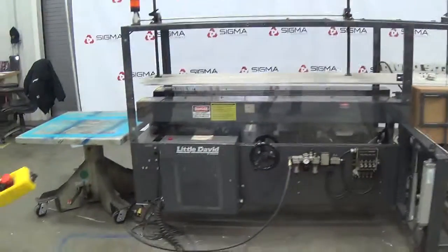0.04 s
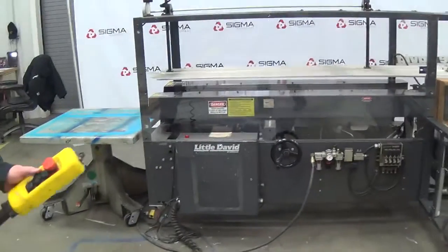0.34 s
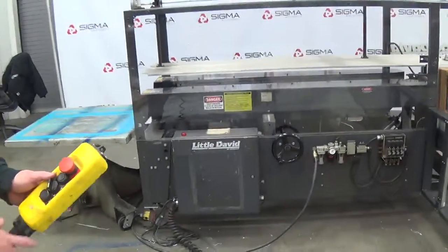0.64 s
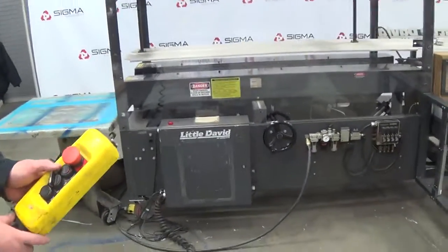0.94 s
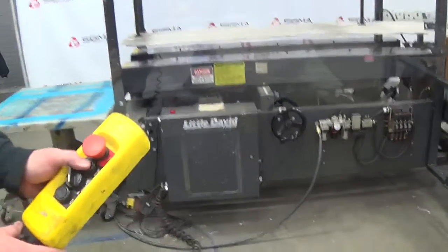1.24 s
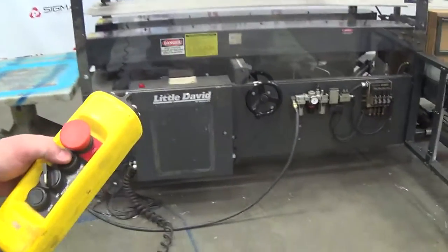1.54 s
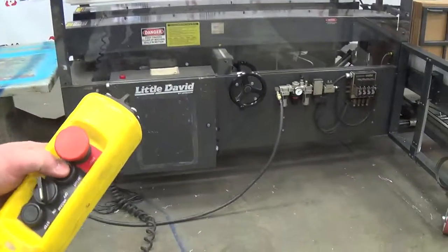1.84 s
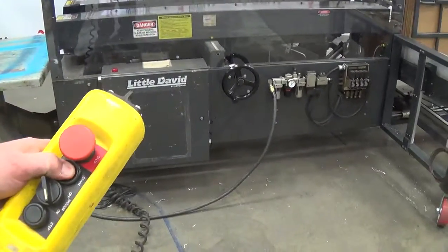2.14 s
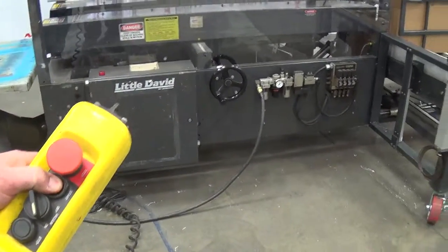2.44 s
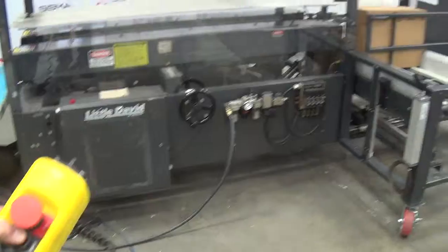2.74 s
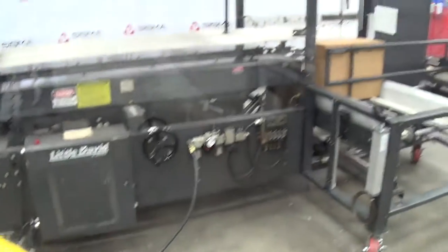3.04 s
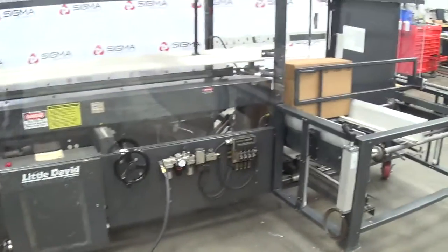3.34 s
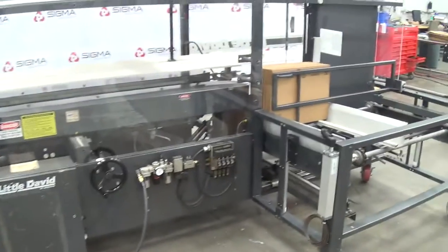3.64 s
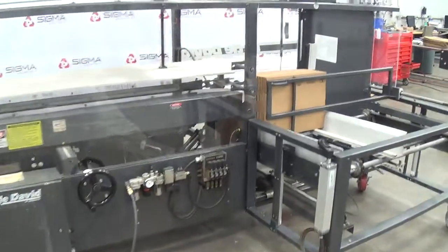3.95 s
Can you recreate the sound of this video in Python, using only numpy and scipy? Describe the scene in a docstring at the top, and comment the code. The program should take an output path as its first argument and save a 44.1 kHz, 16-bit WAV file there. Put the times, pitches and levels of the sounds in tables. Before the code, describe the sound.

A carton-packing machine is switched on after a stretch of soft workshop ventilation hum. A nearby click and a loud metallic clack set off steady rumbling and roller clatter, while compressed air hisses and twice pulses in a fast flutter.

```python
"""In a quiet workshop, humming with ventilation, a carton-packing machine is started from a pendant.
The button clicks and the switchgear clacks: impacts that set a housing and a steel frame ringing.
The motor hums in steady partials while the conveyor rumbles, clinks and rattles along.
Compressed air hisses from the valves and twice surges in a fast flutter, a train of puffs
coloured by the resonances of the panels. Then the switchgear clacks again."""
import sys
import numpy as np
from scipy import signal
from scipy.fft import rfft, irfft, next_fast_len
from scipy.io import wavfile
from scipy.ndimage import map_coordinates

SR = 44100
rng = np.random.default_rng(int(sys.argv[2]) if len(sys.argv) > 2 else 0)


def output_pcm(signal):
    """Save a mono or channel-first signal as 16-bit PCM at the path in sys.argv[1].

    Samples are clipped to [-1, 1] before scaling.
    """
    pcm = np.clip(np.atleast_2d(signal).T, -1, 1) * 32767
    wavfile.write(sys.argv[1], SR, np.round(pcm).astype(np.int16))


N = 176400
CLANG_S = 2.038


def amp(db):
    """Amplitude ratio of a level in decibels."""
    return 10 ** (np.asarray(db) / 20)


def unit(x):
    """Normalisation to rms 1."""
    return x / np.sqrt(np.mean(x ** 2) + 1e-20)


def clock(size=N):
    """Time of every sample in seconds."""
    return np.arange(size) / SR


def along(points, hz):
    """Interpolation of (frequency_hz, value) points on a logarithmic frequency axis."""
    f, v = np.transpose(points)
    return np.interp(np.log(hz + 1), np.log(f + 1), v)


def curve(rows):
    """Linear interpolation of (time_s, value) points at every sample."""
    return np.interp(clock(), *np.transpose(rows))


def wobble(rate):
    """Smooth random modulation, with rate knots a second."""
    return map_coordinates(rng.standard_normal(4000), [clock() * rate], mode="mirror")


def filtered(x, response):
    """Linear filtering: the spectrum is multiplied by a frequency response."""
    m = next_fast_len(x.shape[-1] + 8192)
    return irfft(rfft(x, m) * response(np.fft.rfftfreq(m, 1 / SR)), m)[..., :x.shape[-1]]


def stereo(pair, colour):
    """Partial coherence: two unrelated signals, coloured, add on the left and subtract on the right."""
    # width of the sound field: frequency_hz, side_minus_mid_db
    width = [(60, -9), (125, -21), (250, -17.5), (500, -10.5), (2000, -8.5), (4000, -9), (9000, -10.5)]
    mid, side = filtered(pair, lambda hz: amp([colour(hz), colour(hz) + along(width, hz)]))
    return np.array([mid + side, mid - side])


def noise(colour, size=N):
    """Stereo Gaussian noise of rms 1; colour gives its spectral envelope in dB."""
    return unit(stereo(rng.standard_normal((2, size)), colour))


def hump(centre_hz, octaves):
    """Spectral envelope of a single resonance, in dB."""
    def colour(hz):
        detuning = np.log2((hz + 1) / centre_hz) / octaves
        return -20 * np.log10(1 + detuning ** 2 / 2 + detuning ** 4 / 20)
    return colour


def tilted(points, tilt_db):
    """Spectral envelope with an added slope of tilt_db per octave."""
    return lambda hz: along(points, hz) + tilt_db * np.log2(hz + 1)


def burst(colour, attack, hold, t60):
    """A noise transient: linear rise, then exponential decay from time hold; all in seconds."""
    t = clock(SR // 2)
    decay = amp(-60 * np.maximum(t - hold, 0) / t60)
    return noise(colour, size=len(t)) * np.minimum(t / attack, 1) * decay


def ring(modes, contact_s=0.00053):
    """Free vibration of a struck part: a sum of damped modes that builds up during contact."""
    t = clock(SR // 2)
    vibration = sum(amp(db - 60 * t / t60) * np.sin(2 * np.pi * hz * t + rng.uniform(0, 2 * np.pi))
                    for hz, db, t60 in modes)
    return np.minimum(t / contact_s, 1) * vibration * np.sqrt(2)


def tones(partials, waver_s):
    """Partials made slightly unsteady by random phase modulation."""
    return sum(amp(db) * np.sqrt(2) * np.sin(2 * np.pi * hz * (clock() + waver_s * wobble(5.89)))
               for hz, db in partials)


def steady(x, seconds):
    """Division by the running rms evens out the slow swells of a noise."""
    power = signal.fftconvolve(np.mean(x ** 2, 0), np.hanning(round(2 * seconds * SR)), "same")
    return unit(x / np.sqrt(np.abs(power) + 1e-9))


def add(out, start_s, x):
    """Superposition of x on out, from start_s."""
    i = round(start_s * SR)
    out[:, i:i + x.shape[-1]] += x[..., :max(N - i, 0)]


def ventilation():
    """Broadband flow noise, the fading drone of a duct resonance and a fan's tonal whine."""
    # spectrum of the moving air: frequency_hz, density_db
    air_spectrum = [(25, 0), (80, -13), (140, -3.5), (240, -7.5), (330, 0.5), (700, 1.5), (1200, -1),
                    (2500, -9.5), (6000, -20), (11000, -21)]
    # swell of the fan's whine: time_s, level_db
    fan_levels = [(0, -53.5), (.7, -50.5), (1.2, -50), (1.55, -52), (1.9, -57.5)]
    # partials of the fan: pitch_hz, relative_db
    fan_partials = [(411.9, -1), (1101, -16.5), (121.6, -21.5)]
    air = amp(-54.5) * noise(lambda hz: along(air_spectrum, hz))
    drone_db = -63.5 - 4.5 * clock() + 3.5 * wobble(3.9)
    drone = amp(drone_db) * noise(hump(centre_hz=240.4, octaves=0.038))
    return air + drone + amp(curve(fan_levels)) * tones(fan_partials, waver_s=0.0001)


def pendant():
    """Impact and friction: the pendant ticks, a hand rubs it and knocks its shell into vibration."""
    # small knocks and button clicks: start_s, level_db, centre_hz, width_octaves, t60_s
    ticks = [(0.171, -46, 274, 0.23, 0.095), (1.132, -55.5, 2470, 0.72, 0.079),
             (1.827, -35, 1680, 0.23, 0.05), (1.8925, -42, 2200, 0.5, 0.016),
             (1.942, -45, 3000, 0.91, .014), (1.9672, -24, 2430, 0.25, 0.064),
             (1.967, -31, 2740, 1.1, 0.084)]
    # rubbing of hand and thumb: start_s, length_s, level_db, centre_hz, width_octaves
    rubs = [(0.188, .11, -68, 4900, 0.37), (1.767, 0.044, -62, 5200, 0.14), (1.802, 0.037, -48, 1860, 0.77)]
    # knocks of the hand on the shell: start_s, level_db
    knocks = [(.2776, -35.5), (1.128, -45)]
    # modes of the plastic shell: pitch_hz, relative_db, t60_s
    shell_modes = [(700, -5.5, 0.027), (1260, 3.5, 0.0032), (1800, 7, 0.0052)]
    out = np.zeros((2, N))
    for start, db, hz, octaves, t60 in ticks:
        add(out, start, amp(db) * burst(hump(hz, octaves), attack=0.0002, hold=0.00033, t60=t60))
    for start, length, db, hz, octaves in rubs:
        add(out, start, amp(db) * burst(hump(hz, octaves), attack=length / 2, hold=length, t60=0.079))
    for start, db in knocks:
        add(out, start, amp(db) * ring(shell_modes))
    return out


def hall_tail():
    """The workshop's impulse response, of energy 1: diffuse decay in which the top treble dies first."""
    # reverberation time: frequency_hz, t60_s
    decay_times = [(200, 0.33), (2000, 1), (6000, 0.47), (11000, 0.13)]
    hz, t, spectra = signal.stft(rng.standard_normal((2, SR // 2)), SR, nperseg=256)
    decay = amp(-60 * t / along(decay_times, hz)[:, None])
    tail = signal.istft(spectra * decay, SR, nperseg=256)[1][:, :SR // 2]
    return tail / np.linalg.norm(tail[0])


def reverberation(direct):
    """Reflected sound: the direct sound convolved with the workshop's impulse response."""
    echo = signal.fftconvolve(direct.mean(0)[None], hall_tail(), axes=1)[:, :N]
    return amp(-9.5) * stereo(echo, np.zeros_like)


def clinks(per_s=260, centre_hz=1085.6, log_spread=1.2, t60=0.13):
    """Random impacts: loose rollers and chain links each ring in one damped mode of their own pitch."""
    out, t = np.zeros((2, N)), clock(SR // 8)
    for when, pitch, size, place in rng.random((int(per_s * N / SR), 4)):
        hz = centre_hz * np.exp(log_spread * (2 * pitch - 1))
        energy = -np.log(1 - size) / hz  # exponentially distributed, weaker at high pitch
        link = np.sin(2 * np.pi * hz * t) * amp(-60 * t / t60) * np.sqrt(energy)
        add(out, when * N / SR, np.outer([place + .5, 1.5 - place], link))
    return unit(out)


def conveyor(start_s=1.97, spin_up_s=0.0064, clatter_per_s=53):
    """Rotation and rolling contact: the motor's tonal hum over a low rumble and clattering rollers."""
    # course of the rumble: time_s, relative_db
    rumble_levels = [(2.06, -38), (3.346, -40), (3.96, -36.5)]
    # spectrum of the rumble: frequency_hz, density_db
    rumble_spectrum = [(25, -47), (50, -50), (70, -25), (140, -19.5), (200, -4), (300, 0), (420, -8),
                       (650, -31), (1500, -49)]
    # course of the rollers: time_s, level_db
    roller_levels = [(2.05, -37.5), (2.2, -41), (2.45, -38.5), (2.75, -38), (2.95, -39.5), (3.25, -39),
                     (3.6, -39.5), (3.95, -37)]
    # spectrum of the rolling noise: frequency_hz, density_db
    roller_spectrum = [(200, -32), (500, 2), (900, -1.5), (1600, -2), (2400, -9), (3300, -14.5),
                       (5000, -15.5), (7000, -20), (9000, -28.5), (11000, -22.5)]
    # partials of the motor: pitch_hz, level_db
    motor_partials = [(119.7, -56), (317.6, -54.5), (411, -57.5), (765, -64), (925, -54), (3165, -69)]
    low_noise = steady(noise(lambda hz: along(rumble_spectrum, hz)), seconds=0.027)
    rumble = amp(curve(rumble_levels) - 3) * low_noise
    clatter = amp(curve(roller_levels) + 0.5 * wobble(clatter_per_s))
    rolling = noise(lambda hz: along(roller_spectrum, hz))
    rollers = clatter * unit(rolling + amp(-5) * clinks())
    running = np.clip((clock() - start_s) / spin_up_s, 0, 1)
    return running * (rumble + rollers + tones(motor_partials, waver_s=0.00013))


def switchgear(lead_s=0.0095, lead_db=-11):
    """Two-stage impact: a light blow leads the main one, which excites the modes of the housing."""
    # switch clacks: start_s, level_db, left_minus_right_db, tilt_db_per_octave
    clacks = [(1.9977, -14, -2.5, 0.5), (3.9978, -16, -1, -0.5)]
    # spectrum of a blow: frequency_hz, density_db
    blow_spectrum = [(100, -4), (400, 1), (1100, -18), (1600, -9), (2600, 0), (3700, -5), (6400, -5),
                     (11000, -5)]
    # modes of the switch housing: pitch_hz, relative_db, t60_s
    housing_modes = [(690, -13, 0.033), (1067, -14, 0.062), (2200, -10.5, 0.031), (2710, -5.5, 0.02),
                     (4610, -18, 0.065), (5810, -10.5, 0.04), (6920, -10, 0.035), (8600, -10, 0.035)]
    out = np.zeros((2, N))
    for start, db, pan_db, tilt in clacks:
        colour = tilted(blow_spectrum, tilt)
        lead = burst(colour, attack=0.001, hold=0.0028, t60=0.027)
        blow = burst(colour, attack=0.0013, hold=0.0016, t60=0.017) + ring(housing_modes)
        add(out, start - lead_s, amp(db + lead_db) * lead)
        add(out, start, amp(db + pan_db * np.array([[.5], [-.5]])) * blow)
    return out


def valves():
    """Turbulent jet noise: short exhausts of compressed air."""
    # valve exhausts: start_s, length_s, level_db, tilt_db_per_octave
    exhausts = [(1.997, 0.008, -36.5, 3), (2.028, 0.058, -38, -3), (2.179, 0.056, -38, -0.5),
                (2.352, 0.015, -48, 5), (2.587, 0.011, -43, 6), (2.604, 0.062, -43.5, -2.5),
                (2.979, 0.14, -48, -4), (3.4, 0.017, -49, -3), (3.44, 0.0071, -38, -1)]
    # spectrum of the jet: frequency_hz, density_db
    jet_spectrum = [(500, -15), (2000, 5), (5000, 4), (8000, 4), (11000, 0.5)]
    out = np.zeros((2, N))
    for start, length, db, tilt in exhausts:
        hiss = burst(tilted(jet_spectrum, tilt), attack=length * 0.18, hold=length, t60=0.38)
        add(out, start, amp(db) * hiss)
    return out


def clang(tick_s=2.0333, tick_hz=4770, tick_db=-13, tick_t60_s=0.0057):
    """Modal ringing of metal: a thin, heavily damped tick, then the longer ring of the steel frame."""
    # modes of the frame: pitch_hz, relative_db, t60_s
    steel_modes = [(3850, -9, 0.095), (4720, -10, 0.13), (6160, -10, .2), (7040, -4, .12)]
    out = np.zeros((2, N))
    add(out, tick_s, ring([(tick_hz, tick_db, tick_t60_s)]))
    add(out, CLANG_S, amp(-32.5) * ring(steel_modes))
    return out


def clang_band():
    """Damped resonance: the steel clang's brief ring near 3 kHz, as a narrow band of noise."""
    out = np.zeros((2, N))
    band = burst(hump(centre_hz=3020, octaves=0.034), attack=0.0036, hold=0.015, t60=0.041)
    add(out, CLANG_S, amp(-33.5) * band)
    return out


def panel_lift(hz):
    """Resonance of the machine's panels: each adds a Lorentzian peak to a spectrum in dB."""
    # panel resonances: centre_hz, width_hz, lift_db
    resonances = [(257, 17, 4), (495.5, 34, 12), (677, 35, 9.5), (900, 55, 13), (1222, 37, 6),
                  (1573, 120, 7), (1847, 25, 15.5), (2368, 54, 10), (2977, 63, 10.5)]
    return sum(db / (1 + (2 * (hz - centre) / width) ** 2) for centre, width, db in resonances)


def surges(crest=0.34, foot=0.3, rise_s=0.003, jitter_s=0.00005, scatter_db=0.75):
    """Periodic pulses heard as flutter: a swelling train of like puffs rings in the panels and hall."""
    # air surges: start_s, length_s, puffs_per_s, level_db, tilt_db_per_octave
    flutters = [(2.186, 0.17, 30.2, -31.5, -1.46), (3.655, 0.22, 31.1, -29.5, 0)]
    # spectrum of a puff: frequency_hz, density_db
    puff_spectrum = [(50, -40.5), (140, -7), (255, 10), (400, -4.5), (900, -5.5), (1800, -5.5), (3500, -6),
                     (6500, -4), (11000, -4.5)]
    out = np.zeros((2, N))
    for start, length, rate, db, tilt in flutters:
        train = np.zeros((2, N))
        puff = hall_tail() * np.minimum(clock(SR // 2) / rise_s, 1)
        for delay in np.arange(10) / rate:
            strength = np.interp(delay / length, [0, crest, 1, 1.2], [foot, 1, foot, 0])
            late, louder = rng.standard_normal(2)
            add(train, start + delay + jitter_s * late, strength * amp(scatter_db * louder) * puff)
        sound = stereo(train, lambda hz: tilted(puff_spectrum, tilt)(hz) + panel_lift(hz))
        out += amp(db) * unit(sound) * np.sqrt(length * SR / N)  # energy grows with the length
    return out


def rattles():
    """Sliding and rattling parts of the mechanism radiate bursts of noise, each about one resonance."""
    # slides and rattles: start_s, length_s, level_db, centre_hz, width_octaves
    movements = [(2.228, 0.024, -34.5, 273, 0.26), (2.333, 0.077, -32.5, 1320, 0.51),
                 (2.359, 0.076, -36, 520, 0.86), (2.363, 0.0086, -43, 5500, 0.076),
                 (2.582, 0.014, -35, 590, 0.8), (2.957, 0.027, -42.5, 2950, 0.68),
                 (3.171, 0.0087, -43, 1780, 0.62), (3.29, 0.029, -33.5, 885, 0.71),
                 (3.439, 0.077, -46, 2510, 0.59)]
    out = np.zeros((2, N))
    for start, length, db, hz, octaves in movements:
        add(out, start, amp(db) * burst(hump(hz, octaves), attack=length * 0.67, hold=length, t60=0.33))
    return out


def scene():
    """Superposition of all sources, with a slowly drifting level difference between left and right."""
    # stereo balance: time_s, left_minus_right_db
    balance = [(0, 0.5), (1.3, 2), (1.98, 0.3), (2.5, 0), (3.2, 0.4), (3.8, 1.3)]
    background = ventilation()
    contacts = pendant() + switchgear() + clang()
    echo = reverberation(contacts)
    machine = clang_band() + conveyor() + rattles() + valves() + surges()
    return (background + contacts + echo + machine) * amp(np.outer([.5, -.5], curve(balance)))


def record(dry):
    """Band limiting: a high-pass thins the deep bass and a steep low-pass removes the top treble."""
    low_cut_hz, top_hz = 91, 11080
    thinned = signal.sosfilt(signal.butter(2, low_cut_hz, "high", fs=SR, output="sos"), dry)
    return filtered(thinned, lambda hz: 1 / (1 + (hz / top_hz) ** 300))


dry = scene()
out = record(dry)
output_pcm(out)
```